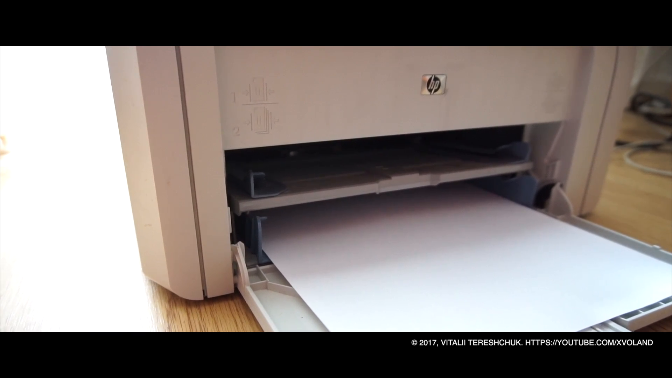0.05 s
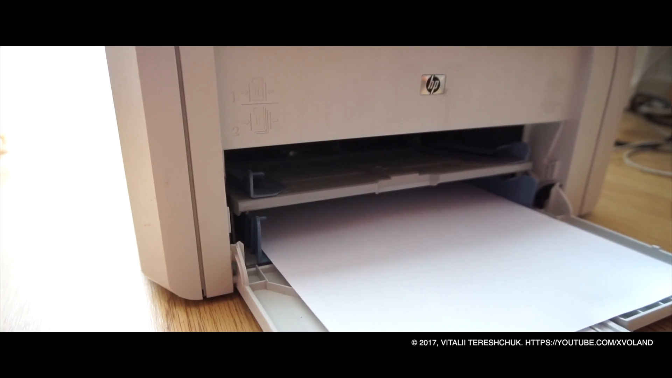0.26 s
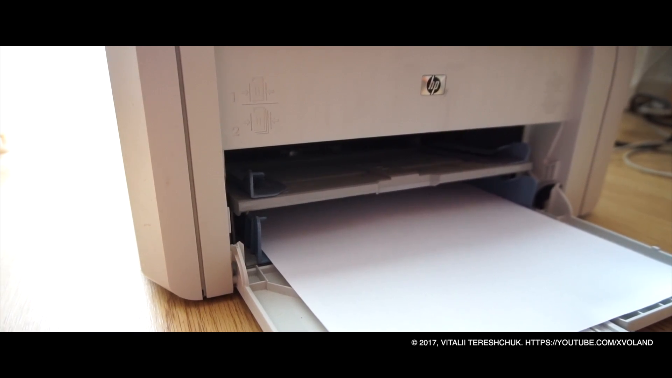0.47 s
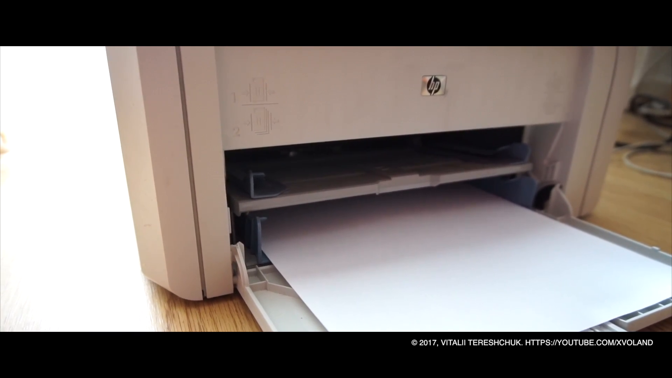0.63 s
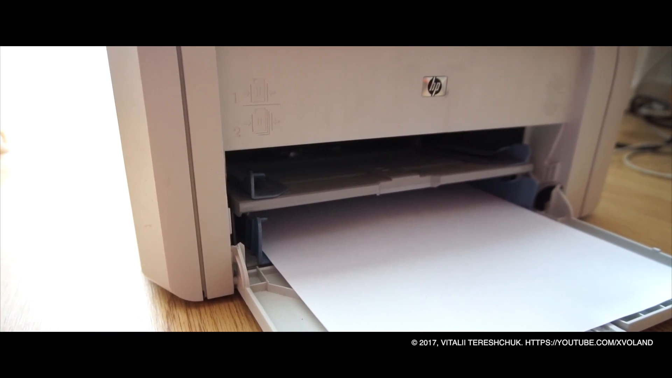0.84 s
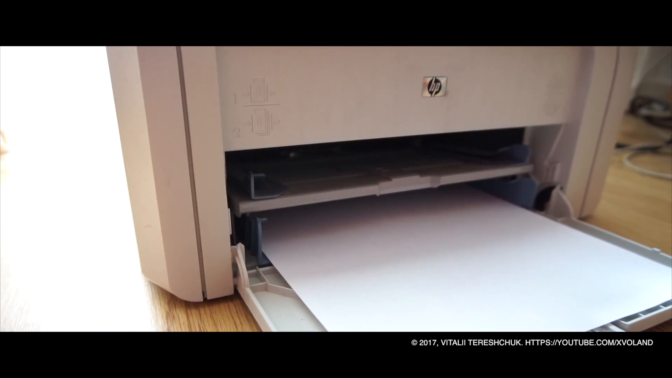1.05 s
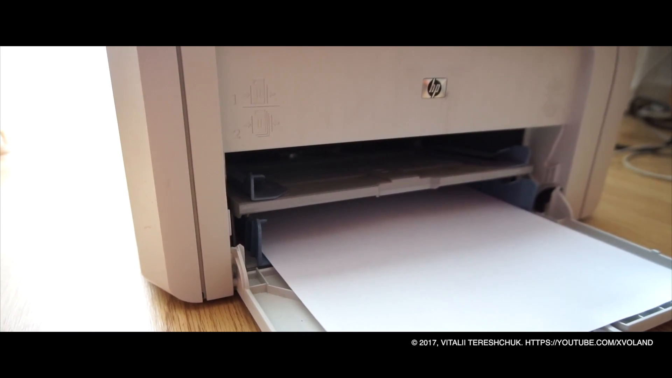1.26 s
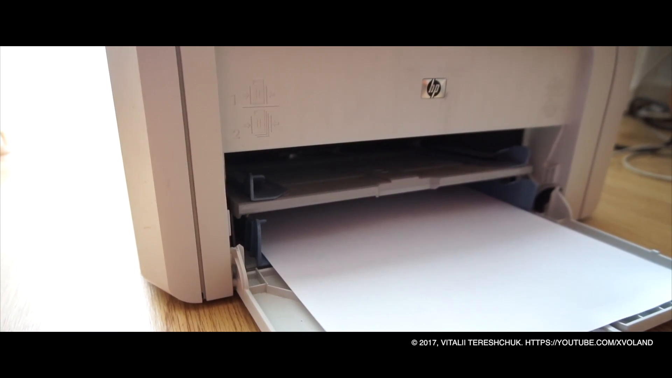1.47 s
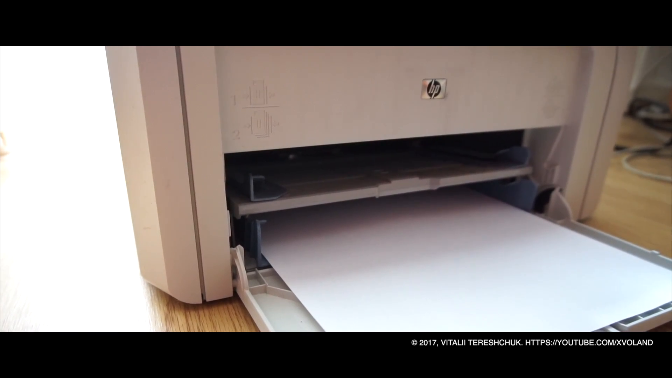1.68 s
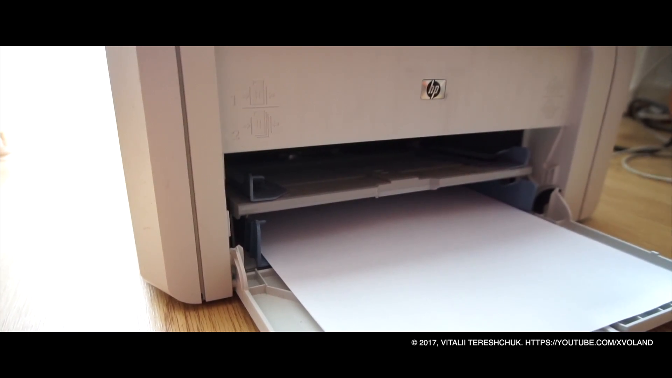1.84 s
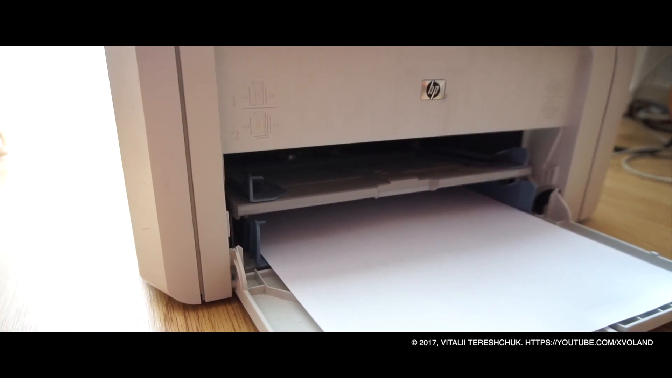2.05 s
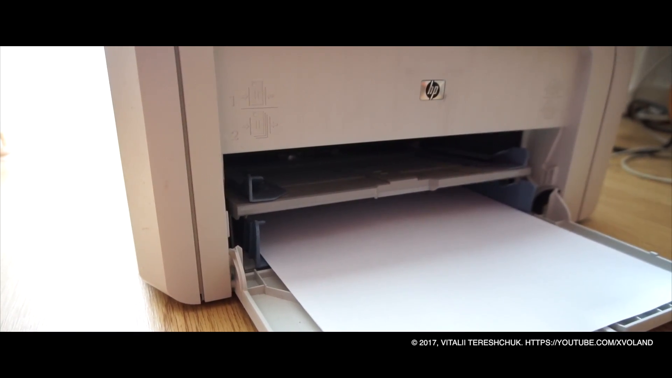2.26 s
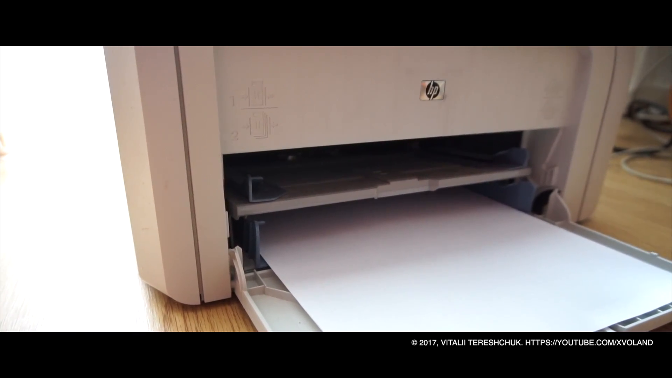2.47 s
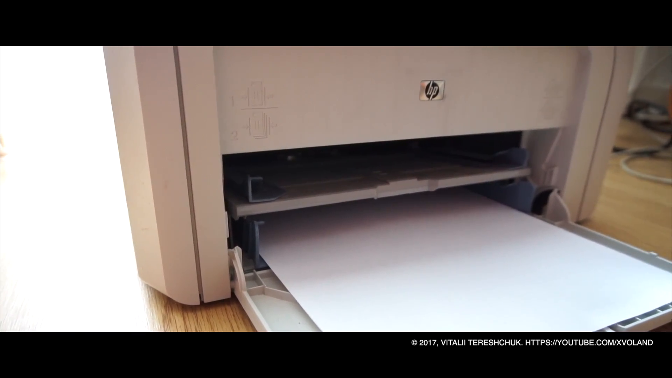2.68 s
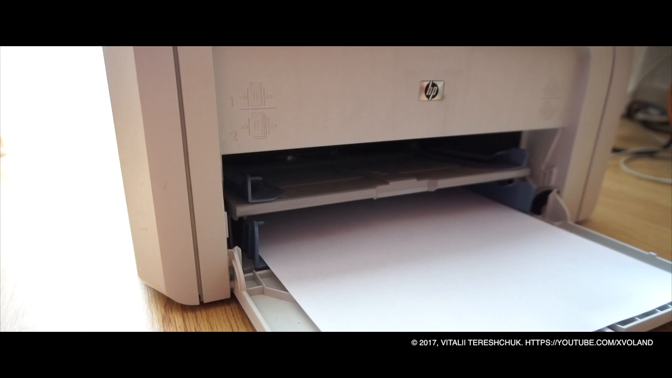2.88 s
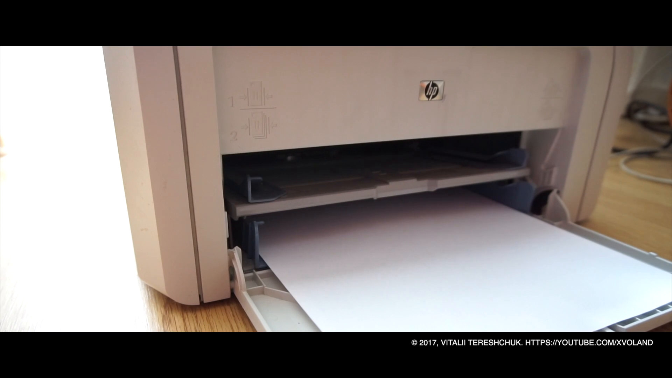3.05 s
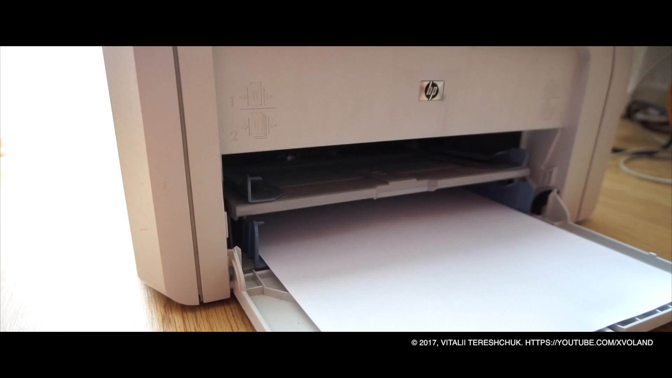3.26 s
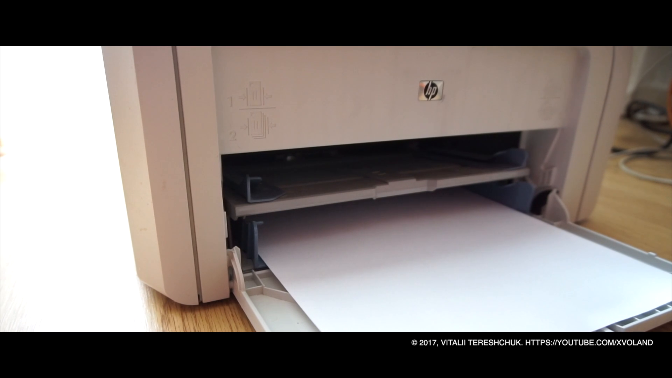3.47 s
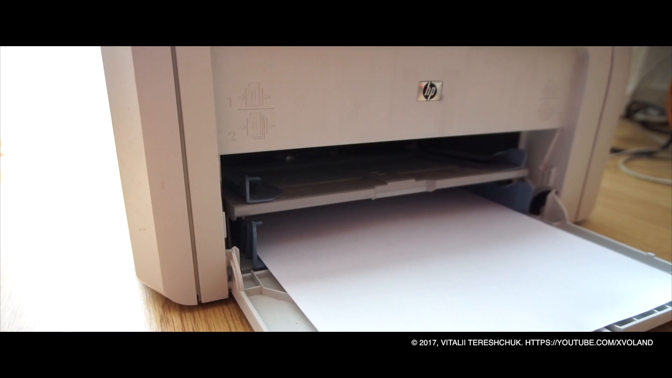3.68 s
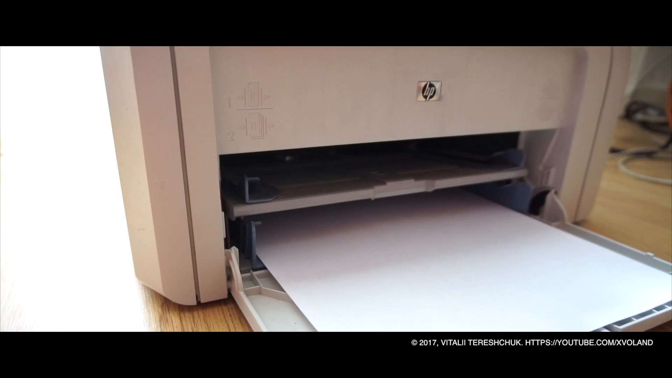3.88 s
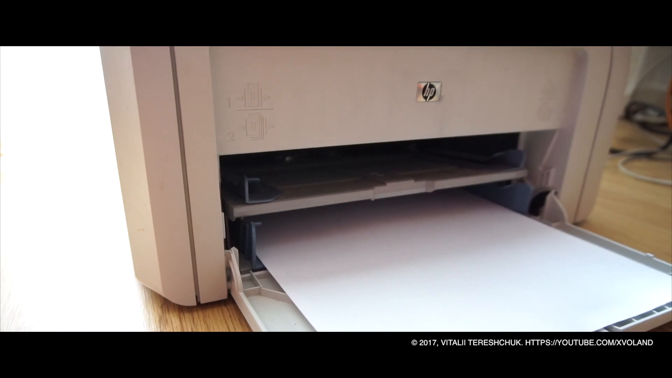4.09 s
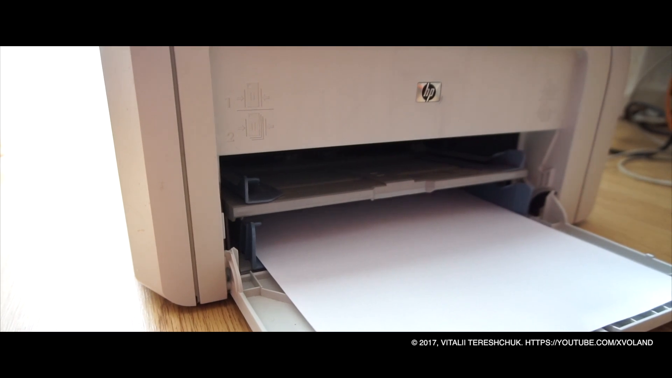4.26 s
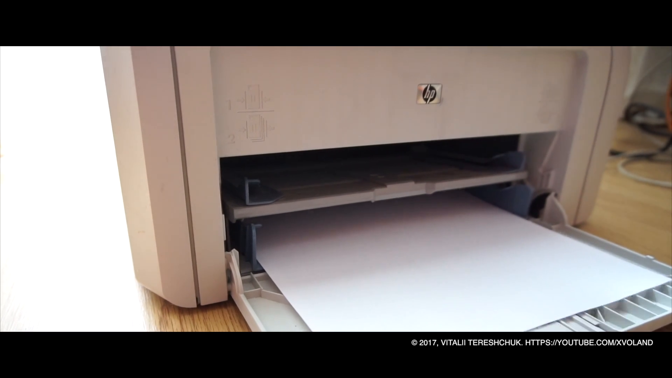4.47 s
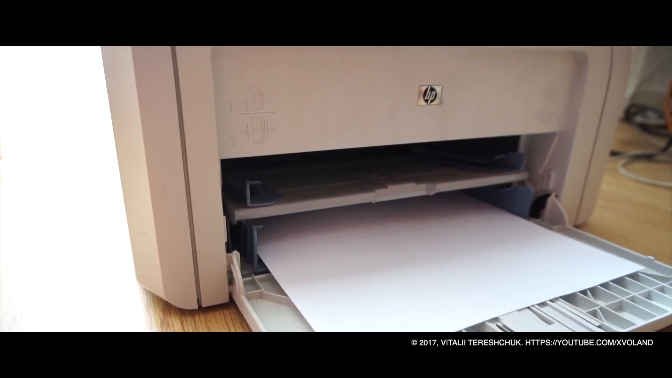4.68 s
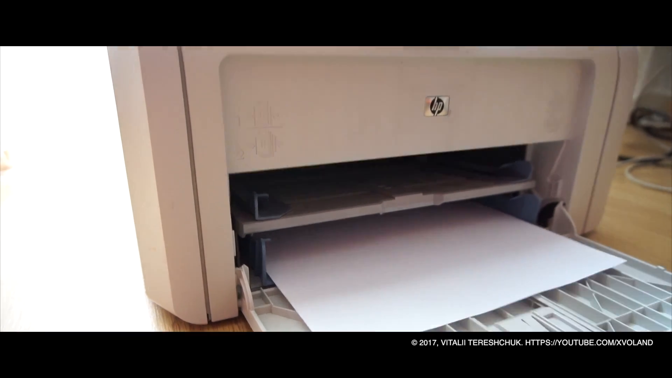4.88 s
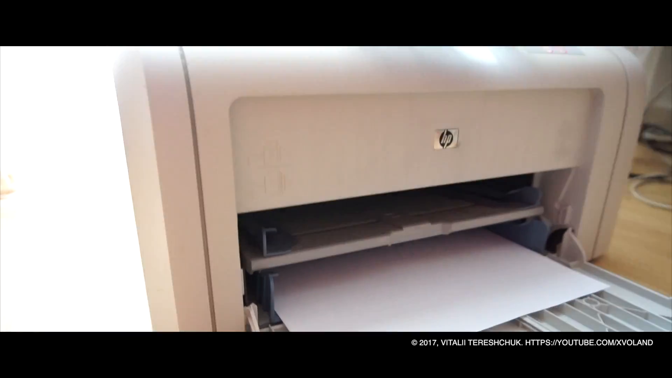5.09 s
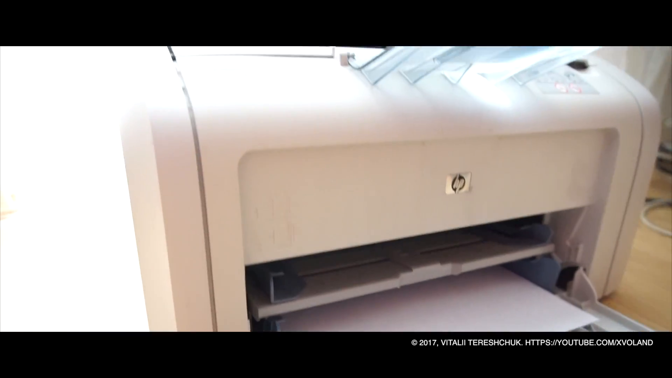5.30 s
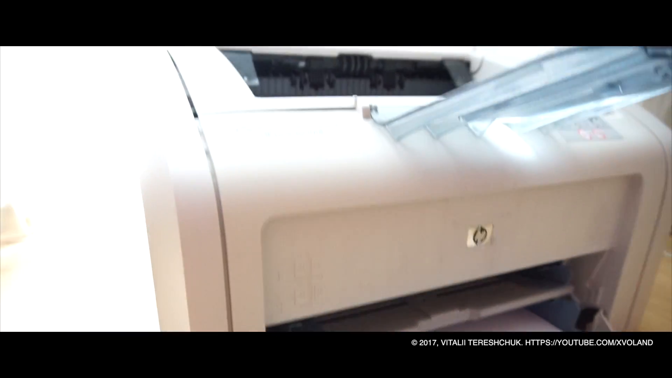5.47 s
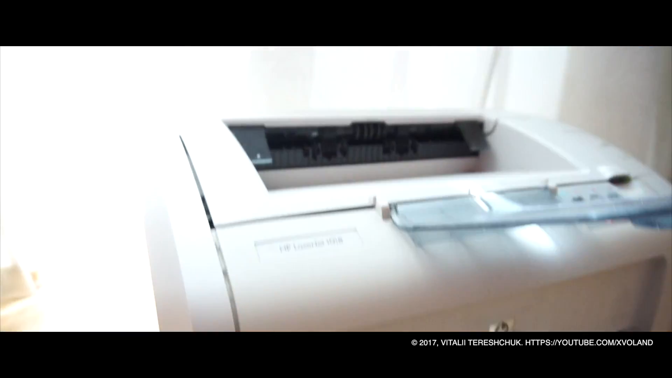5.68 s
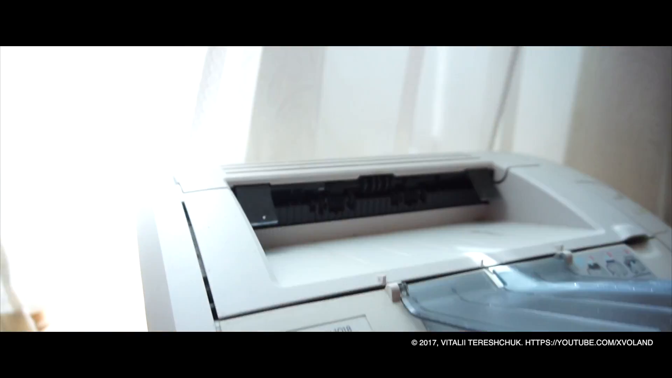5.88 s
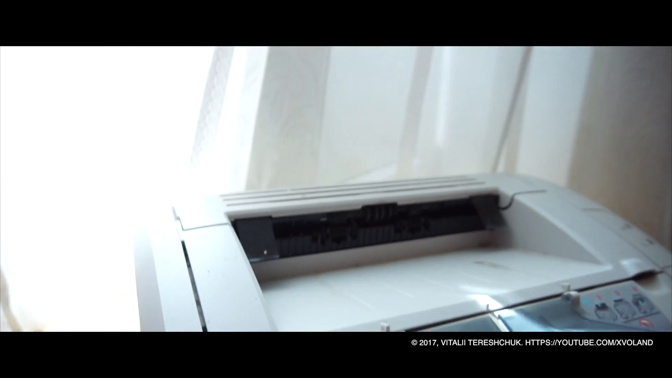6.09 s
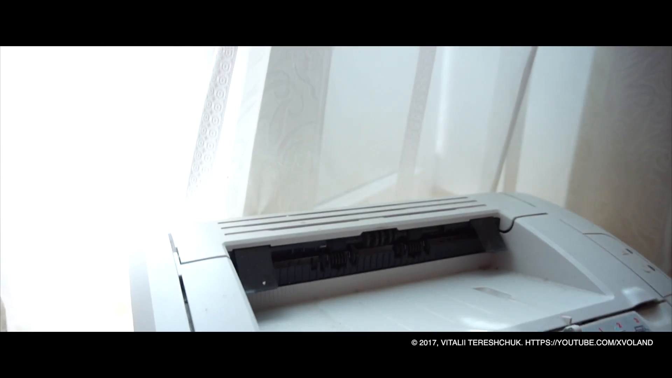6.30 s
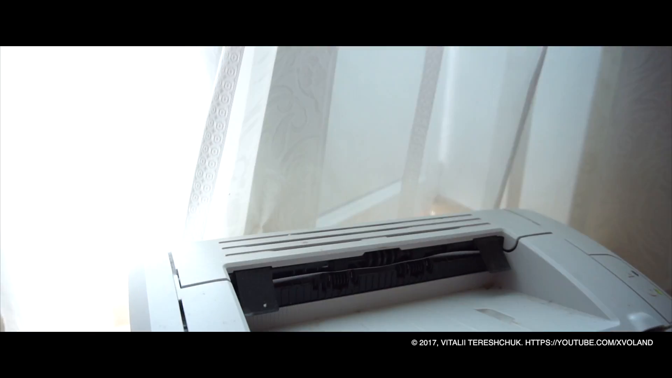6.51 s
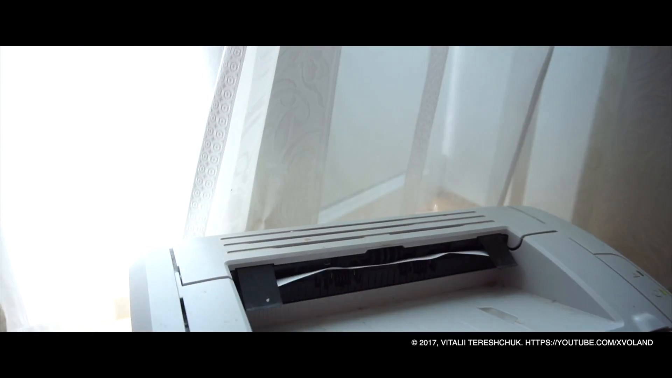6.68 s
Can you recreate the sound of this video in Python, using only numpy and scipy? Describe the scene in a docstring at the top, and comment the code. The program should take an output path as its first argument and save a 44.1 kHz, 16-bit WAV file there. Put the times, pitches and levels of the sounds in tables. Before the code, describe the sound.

A desktop printer is heard very close in a small, fairly dry room. A steady mid-low motor hum with gear rumble and soft hiss runs until about 0.9 s, when it brakes abruptly into a short, fluttering buzz with a dying rattle. Around 1.05 s it kicks and lurches, groaning upward to speed by 1.3 s, while a thin whistle climbs until about 2 s. The hum, briefly stronger, settles into a steady run with tiny dry chirps. At 4.05-4.25 s plastic parts clack in a rapid cluster; the motor grows louder under load. From 4.3 to 5.1 s a sheet jerks, rubs and hisses, strongest near 4.8 s, with clacks at 4.8 and 4.86. More hard clacks cluster at 5.1-5.3 s. The microphone rises, the hum wavers and weakens, high tones emerge, dull paper rubbing continues, and a scrape swells into crackle at 6.7 s.

```python
"""A desktop laser printer, heard close by in a small room: its drive hums from motor steps and gear teeth,
halts with a buzz, and groans back to speed while the mirror motor whistles up.
A solenoid trips the pick-up roller, a sheet rubs and hisses off the stack, and the lift plate clacks back.
The microphone then rises over the lid, where the sheet scrapes and crackles into the exit rollers.
Hums are sums of sines; rubbing and paper are shaped noise; clacks are short bursts that ring the plastic."""
import sys
import numpy as np
from scipy import signal
from scipy.fft import rfft, irfft, next_fast_len
from scipy.io import wavfile
from scipy.ndimage import uniform_filter1d, map_coordinates

SR = 44100
rng = np.random.default_rng(int(sys.argv[2]) if len(sys.argv) > 2 else 0)


def dump_mix(stems):
    """Bounce the given channels to the path in sys.argv[1] as a 16-bit WAV at rate SR."""
    frames = np.atleast_2d(stems).T  # one column per channel
    limited = np.clip(frames, -1, 1)  # hard clip at full scale
    pcm = np.round(limited * 32767).astype(np.int16)
    wavfile.write(sys.argv[1], SR, pcm)


N = 297234
TIME = np.arange(N) / SR
TOP_HZ = 15800  # nothing sounds above this
SHAFT_HZ = 20.083  # locked speed of the drive shaft, turns a second
# the drive begins to stop, is held still, pulls away, and locks to speed again (s)
STOP_S, HOLD_S, START_S, LOCK_S = 0.86, 0.886, 1.04, 1.27
# the microphone rises from the tray to above the lid: start, duration (s)
RISE_S, RISE_TAKES_S = 5.216, 0.88

# how well the frame radiates: (frequency [Hz], gain [dB])
FRAME_RADIATION = [(40, -42), (130, -19), (200, -6), (270, -2), (400, 14), (520, 14), (720, -5),
                   (1200, -13.5), (4000, -27)]
# colour of the gears' rumble: (frequency [Hz], relative level [dB])
RUMBLE_COLOUR = [(25, -46), (105, -54), (150, -12), (205, -4), (250, -7), (330, -0.5), (520, 3.5),
                 (700, -5), (920, 1.5), (1070, -7), (1150, 0.5), (1225, 6), (1340, -9), (2500, -40)]
# colour of the paper's hiss: (frequency [Hz], relative level [dB])
PAPER_COLOUR = [(1760, -46), (2600, -13), (3620, -15), (3960, -5), (4310, -1.5), (4910, -2.5), (5900, 2.5),
                (6910, -3.5), (8400, 0.5), (9650, -3), (12100, -0.5), (14000, -6.5), (15800, -10.5)]
# the hums fade and swell as the microphone moves, and the motor step dips as the load jolts: (time [s], motor
# step change [dB], mirror motor change [dB])
HUM_FADING = [(5.2, 0.5, 0), (5.26, -5.5, -1), (5.42, 1, -0.5), (5.85, 0, 1), (5.97, -1, -1),
              (6.14, 3, -2), (6.26, -8, 1), (6.39, 1.5, 0.5), (6.51, -11, -1.5), (6.7, 1.5, -0.5)]


def amp(db):
    """Turn decibels into a gain."""
    return 10 ** (np.asarray(db) / 20)


def unit(x):
    """Scale to an rms of 1."""
    return x / np.sqrt(np.mean(x ** 2) + 1e-20)


def along(points, hz):
    """Read a curve of (Hz, value) points on a logarithmic frequency axis."""
    point_hz, values = np.transpose(points)
    return np.interp(np.log(hz + 1), np.log(point_hz + 1), values)


def curves(rows):
    """Draw one value per sample for each column after the time."""
    times, *columns = np.transpose(rows)
    return [np.interp(TIME, times, column) for column in columns]


def between(start, end, fade):
    """Open a gate with soft edges."""
    return np.clip((TIME - start) / fade, 0, 1) * np.clip((end - TIME) / fade, 0, 1)


def ramp(start, length):
    """Rise from 0 to 1 and stay there."""
    return np.clip((TIME - start) / length, 0, 1)


def bump(s, width):
    """Make a smooth swell of height 1 around time s."""
    return np.exp(-((TIME - s) / width) ** 2)


def wobble(rate):
    """Make a smooth random curve with this many random points a second."""
    return map_coordinates(rng.standard_normal(int(N * rate / SR) + 4), [TIME * rate])


def phase(hz):
    """Add up a moving frequency into a running angle."""
    return 2 * np.pi * np.cumsum(hz) / SR


def filtered(x, response):
    """Multiply the spectrum of x by a response that depends on frequency."""
    size = x.shape[-1]
    padded = next_fast_len(size + SR // 8)
    spectrum = rfft(x, padded) * response(np.fft.rfftfreq(padded, 1 / SR))
    return irfft(spectrum, padded)[..., :size]


def resonance(f, centre, width):
    """Respond like one ringing part: strongest at its centre, narrower if it rings longer."""
    return 1j * f * width / (centre * centre - f * f + 1j * f * width)


def resonate(x, modes):
    """Ring x through (Hz, width Hz, dB) resonances of alternating sign; rms 1."""
    def response(f):
        return sum((-1) ** k * amp(db) * resonance(f, centre, width)
                   for k, (centre, width, db) in enumerate(modes))
    return unit(filtered(x, response))


def noise(spectrum, size=N):
    """Make coloured stereo noise of rms 1, alike left and right in the bass and unrelated in the treble."""
    # (frequency [Hz], left-right likeness [0 to 1])
    likeness = [(100, 1), (400, 0.93), (1300, 0.65), (2000, 0.6), (4000, 0.35), (8000, 0.29),
                (13000, 0.022)]

    def response(hz):
        turn = np.arccos(np.clip(along(likeness, hz), -1, 1)) / 2
        return amp(along(spectrum, hz)) * [np.cos(turn), np.sin(turn)]
    mid, side = filtered(rng.standard_normal((2, size)), response)
    return unit(np.array([mid + side, mid - side]))


def patchy(x, patchy_db):
    """Give noise random swells, a few hundred Hz wide and some tens of ms long; rms 1."""
    z = signal.stft(x, nperseg=256)[2]
    field = uniform_filter1d(rng.standard_normal(z.shape[1:]), size=3, axis=0)
    field = uniform_filter1d(field, size=9, axis=1)
    return unit(signal.istft(z * amp(patchy_db * unit(field)), nperseg=256)[1][:, :N])


def add(track, s, sound):
    """Mix a sound in at time s."""
    part = track[:, round(s * SR):][:, :sound.shape[-1]]
    part += sound[..., :part.shape[-1]]


def shaft_speed(early_hz=20.18, pull_hz=3.6):
    """Turns a second: steady, braked to rest, then gathering speed by a constant ratio until it locks."""
    braking = early_hz * (1 - ramp(STOP_S, HOLD_S - STOP_S))
    run_up = pull_hz * (SHAFT_HZ / pull_hz) ** ramp(START_S, LOCK_S - START_S)
    return np.where(TIME < START_S, braking, run_up)


def drive_level(free_db, surge_db, feed_db, lid_db):
    """A layer's level in dB follows the strain of the restart, the load of the sheet and the microphone."""
    # the strain builds up in 0.078 s and settles over 0.53 s
    surge = ramp(LOCK_S, 0.078) * np.exp(-np.maximum(TIME - LOCK_S, 0) / 0.53)
    # the sheet loads the drive from 4.1 s and lets go from 5.27 s
    feed = ramp(4.1, 0.45) - ramp(5.27, 0.78)
    return free_db + surge_db * surge + feed_db * feed + lid_db * ramp(RISE_S, RISE_TAKES_S)


def drive(step_order=24, step_run_up_db=-11, mesh_run_up_db=-23, lock_fade=0.016):
    """Motor steps and gear teeth hum at multiples of one shaft's speed, and sweep, weaker, as it speeds up."""
    # multiples of the shaft speed at which the gears sound, and their relative levels [dB]
    gear_orders = [10, 20, 22, 23, 25, 27, 30, 40, 45, 47, 48, 50, 60, 72, 79, 80, 95, 96, 97, 120, 144,
                   145, 191, 192]
    gear_db = [-69, -67.5, -76.5, -72.5, -75.5, -71.5, -76, -69.5, -74.5, -72.5, -67, -75.5, -62.8, -77,
               -80, -76, -73, -75, -80, -96, -77, -82, -81.5, -84]
    # layer levels: running free [dB], then extra after the restart, while feeding, above the lid [dB]
    step_levels = (-48, 11.5, 8, -11.5)
    mesh_levels = (0.6, 0.5, 9, -4)
    speed = shaft_speed()
    turning = 1 - between(STOP_S, START_S + 0.01, 0.015)
    slipping = between(START_S - 0.01, LOCK_S + 0.002, lock_fade)
    step_db = drive_level(*step_levels) + step_run_up_db * slipping + curves(HUM_FADING)[0]
    mesh_db = drive_level(*mesh_levels) + mesh_run_up_db * slipping
    shaft = phase(speed * (1 + 0.00089 * wobble(45)))

    def radiated(order):
        # the frame's gain now, relative to its gain at locked speed
        return along(FRAME_RADIATION, order * speed) - along(FRAME_RADIATION, order * SHAFT_HZ)
    step_gain = amp(step_db + radiated(step_order) + 0.95 * wobble(20))
    out = step_gain * np.sin(step_order * shaft) * amp([[-0.6], [0.6]])
    for order, db in zip(gear_orders, gear_db):
        offset = rng.uniform(0, 2 * np.pi) + rng.normal(0, 0.1, (2, 1))
        gain = amp(db + mesh_db + radiated(order) + 1.8 * wobble(12))
        out += gain * np.sin(order * shaft + offset + 0.18 * wobble(20))
    return np.sqrt(2) * turning * out


def gear_noise(coast_t60=0.32, rest_db=-19, hiss_growth=0.52, swell_width=0.069, run_up_db=-2):
    """Teeth and bearings rub, swelling a little at the shaft's pace; the rumble dies away in the halt."""
    # colours of the hiss and of the frame's drone: (frequency [Hz], relative level [dB])
    hiss_colour = [(820, -49), (1400, -3.5), (1710, -3.5), (1820, -4.5), (1980, -1.5), (2080, -7.5),
                   (2400, -4), (2760, -10.5), (3000, -8.5), (3180, -10), (4020, -8.5), (4310, -9.5),
                   (9610, -14), (10900, -12.5), (15800, -25.5)]
    drone_colour = [(25, -45), (75, -25.5), (105, -25), (160, -23), (207, 10.5), (240, -39), (400, -42)]
    # layer levels: running free [dB], then extra after the restart, while feeding, above the lid [dB]
    rumble_levels = (-58.5, 6, 9, -1.5)
    hiss_levels = (-59.5, -.5, 13, -2)
    drone_levels = (-70.5, -4, 10.5, 0.5)
    # the drone swells now and then: (time [s], level [dB])
    drone_swells = [(.28, -60), (.83, -66), (1.41, -55.5), (1.54, -65), (1.88, -68), (2.13, -55.5),
                    (2.92, -61)]
    turning = np.sin(2 * np.pi * SHAFT_HZ * TIME)
    coasting = amp(-60 * np.maximum(TIME - 0.965, 0) / coast_t60)
    starting = ramp(START_S, 0.01) * amp(run_up_db * (TIME < LOCK_S))
    shaking = np.where(TIME < START_S, coasting, starting)
    rubbing = np.maximum((shaft_speed() / SHAFT_HZ) ** hiss_growth, amp(rest_db) * (1 + shaking))
    rumble_gain = shaking * amp(drive_level(*rumble_levels) + 0.57 * wobble(16) + 1.0 * turning)
    hiss_gain = rubbing * amp(drive_level(*hiss_levels) + 0.4 * wobble(24.87) + 0.3 * turning)
    swelling = sum(amp(db) * bump(s, swell_width) for s, db in drone_swells)
    drone_gain = rubbing * amp(drive_level(*drone_levels)) + shaking * swelling
    return rumble_gain * noise(RUMBLE_COLOUR) + hiss_gain * noise(hiss_colour) + drone_gain * noise(drone_colour)


def chirps(pitch_hz=11100, length=0.0075, level_db=-52, waver=0.0263, slip_s=1.081, slip_db=-1):
    """A dry roller bearing squeaks at the same place in each turn, and once as it breaks free after the halt."""
    chirp_s, roller_turns = 1.815, 13.56  # time of one chirp (s), shaft turns per roller turn
    out = np.zeros((2, N))
    t = np.arange(-SR // 25, SR // 25) / SR
    turns = np.cumsum(shaft_speed()) / SR / roller_turns
    since_chirp = turns - np.interp(chirp_s, TIME, turns)
    times = TIME[1:][np.diff(np.floor(since_chirp)) > 0]
    for s, db in [(s, 0) for s in times] + [(slip_s, slip_db)]:
        slip = waver * unit(uniform_filter1d(rng.standard_normal((2, len(t))), size=70))
        tone = np.sin(2 * np.pi * np.cumsum(pitch_hz * (1 + slip), axis=1) / SR)
        add(out, s + t[0], amp(level_db + db) * np.exp(-(t / length) ** 2) * tone)
    return out


def halt(hold_hz=471, rock_t60=0.35, flutter_db=5, rattle_db=-66):
    """The halted rotor rocks in its magnetic detent, splitting the holding current's buzz and rattling the gears."""
    # buzz of the halted, energised motor: (multiple, level at rest [dB], extra level while rocking [dB])
    hold_tones = [(1, -58.5, -3), (2, -77.5, 10), (3, -75, 10.5), (4, -82, 13), (5, -64, -5), (6, -81, 1),
                  (7, -78, -1), (8, -75, 4), (9, -84, 17), (10, -82, 1), (11, -82, -2)]
    # its rocking mostly quickens, unevenly, as it dies away:
    # (time [s], rocks a second [Hz], tone above the buzz [dB], tone below it [dB])
    rocking = [(.886, 33, -46, -62), (.9, 41, -47, -56), (.925, 40, -49, -45), (.945, 60, -61, -47.5),
               (.97, 68, -50, -63), (1.0, 110, -60, -70), (1.03, 72, -80, -80)]
    # colour of the rattling gears: (frequency [Hz], relative level [dB])
    rattle_colour = [(300, -30), (900, -13), (1400, 1), (2800, -4), (4200, -2), (6000, -21), (12000, -40)]
    rock_hz, upper_db, lower_db = curves(rocking)
    dying = amp(-60 * np.maximum(TIME - 0.95, 0) / rock_t60)
    rock, current = phase(rock_hz), 2 * np.pi * hold_hz * TIME
    bend = dying * (0.08 * np.sin(rock) + 0.1 * wobble(400))

    def flutter():
        swing = flutter_db * np.sin(rock + rng.uniform(0, 2 * np.pi))
        return np.sqrt(dying) * (swing + 2 * wobble(90.4))
    buzz = sum(amp(db + extra_db * dying + flutter()) * np.sin(k * (current + bend))
               for k, db, extra_db in hold_tones)
    split = amp(upper_db) * np.sin(current + rock) + amp(lower_db) * np.sin(current - rock)
    rattle = amp(rattle_db + flutter()) * dying * noise(rattle_colour)
    held = ramp(HOLD_S - 0.003, 0.0039) * (1 - ramp(START_S - 0.003, 0.018))
    return held * (np.sqrt(2) * (buzz + split) + rattle)


def restart(groan_order=60, lurch_width=0.0095, grind_db=-7, pull_db=-66, jitter=0.0353, rough_db=3.5):
    """The motor pulls away in lurches; the main gear mesh groans upward with the shaft, through the casing."""
    # overtones of the groan: (multiple, relative level [dB])
    groan_tones = [(1, -1), (2, -13), (3, -11), (4, -23), (5, -22)]
    # the casing around the main gear: (frequency [Hz], gain [dB])
    casing = [(220, -3), (560, -2), (680, -7), (780, -16), (940, -6), (1060, -8), (1230, 6), (1600, -10),
              (1950, 6), (2600, 2)]
    # the lurches: (time [s], level [dB])
    lurches = [(1.061, -48.5), (1.107, -47.5), (1.128, -54), (1.155, -51), (1.183, -55)]
    hz = groan_order * shaft_speed()
    angle = phase(hz * (1 + jitter * wobble(200)))
    tones = sum(amp(db + along(casing, k * hz) + rough_db * wobble(110)) * np.sin(k * angle)
                for k, db in groan_tones)
    toothed = (1 + np.cos(angle)) * noise(RUMBLE_COLOUR)
    grind = amp(grind_db) * unit(filtered(toothed, lambda f: amp(along(FRAME_RADIATION, f))))
    effort = amp(pull_db) * between(START_S, LOCK_S + 0.022, 0.016)
    effort += sum(amp(db) * bump(s, lurch_width) for s, db in lurches)
    return effort * (np.sqrt(2) * tones + grind)


def rebounds(count=3):
    """Each blow is followed by quicker contacts, mostly weaker; the soft scrape before the first clack grows."""
    # the motor's kick, solenoid, cam, lift plate and flaps: (time [s], level [dB], main pitch [Hz],
    # thud [dB], crack [dB], loss per rebound, negative if it grows louder [dB],
    # fall an octave from the pitch [dB], left minus right [dB])
    blows = [(1.045, -51.5, 1240, 4, -26, 5, 8, 0), (4.044, -35, 2620, -33, -4.5, -4, -2, 7),
             (4.058, -17, 1620, -33, -6, 20, -2, 2.5), (4.0672, -17, 1690, -32, -23, 25, 11, 2.5),
             (4.077, -22.5, 1800, -22, -24, 12, 9, 2.5), (4.094, -31, 1775, -31, -30, 1, 30, 0),
             (4.117, -28.5, 1460, -31, -16, 7.5, 17, 2), (4.192, -17.5, 2200, -17, -34, 26, 65, 3.5),
             (4.199, -17, 1950, -38, -27, 19, 55, 0), (4.215, -23.5, 1480, -40, -12, 22, -3, 8.5),
             (4.22, -27, 2700, -35, -6, 24, 6, 8), (4.2239, -15, 1280, -31, -18, 24, 24, -2),
             (4.2355, -21.5, 1720, -20, -14.5, 6, -1, 2), (4.797, -20.5, 1620, -17, -5, 19, 17, 0),
             (4.864, -16.5, 1780, -27, -23, 7, 16, -1), (5.08, -18, 1810, -19, 0.5, 20, 26, 0.5),
             (5.091, -20.5, 1740, -20, -5, 8, 14, -2), (5.107, -22.5, 2780, -30, -1, 8, 11, 1),
             (5.111, -20.5, 1940, -26, -3, 17, 13, 1), (5.1652, -20, 1560, -32, -14.5, 21, 14, -1),
             (5.2053, -16.5, 1340, -10.5, -15, 8, 5, 0), (5.22, -24.5, 2520, -16, -18, 12, 13, -1),
             (5.231, -10.5, 1404, -26, -8, 18, 5, 1), (5.2362, -17, 1390, -14, -15, 8, 5, 2),
             (5.247, -24.5, 2250, -8, -22, 11, 15, -.5), (5.265, -28.5, 1360, -18, -27, 9, 13, -4),
             (5.316, -33, 795, -5.5, -16, 12, 12, -1), (6.69, -29, 2840, -45, -29, 2, 37, -8)]
    flight_s, shrink = 0.0085, 0.9  # first flight (s), each flight over the one before
    for s, db, hz, thud, crack, loss_db, focus_db, pan_db in blows:
        for k in range(count):
            flights = sum(shrink ** j for j in range(k))
            level = db - loss_db * k ** 1.04
            softer_crack = crack - 7 * k
            yield s + flight_s * flights, level, hz, thud, softer_crack, focus_db, pan_db


def clacks(contact_t60=0.019, crack_t60=0.04, thud_t60=0.19, note_t60=0.032, knock_db=-25, ring_db=-23.0,
           note_db=-7, crack_db=-21, thud_db=-22, dull_db=6, detune=0.014, low_cut_hz=110):
    """Plastic parts strike and chatter: each sounds a note, levers crack, the housing rings, the frame thuds."""
    # resonances of the plastic housing: (frequency [Hz], width [Hz], relative level [dB])
    housing = [(657, 100, -4), (883, 73, 1.5), (1202, 85, 0), (1370, 73, 2), (1493, 52, -1.5),
               (1614, 47, 4), (1770, 68, 2.5), (1915, 72, 2), (2085, 68, -2.5), (2250, 50, 4),
               (2546, 80, -1), (2720, 80, 5), (3030, 140, 0.5), (3650, 70, 1.5), (4050, 130, 1)]
    # small, stiff parts of the feed: (frequency [Hz], width [Hz], relative level [dB])
    levers = [(3040, 320, 2), (3705, 82, -2.5), (3900, 280, -12), (4400, 170, 0.5), (5120, 190, 0.5),
              (5470, 44, 0.5), (6140, 270, -0.5), (7230, 250, -5), (7850, 410, -1.5), (9870, 770, -4.5),
              (12200, 1100, -10.5)]
    # the bare contact before the housing rings, and the thud: (frequency [Hz], level [dB])
    knock_colour = [(400, -30), (900, -5.5), (1300, 1.5), (2200, 0.5), (3300, -4), (6000, -27)]
    thud_colour = [(40, -50), (95, -40), (140, -7), (180, 2), (300, 4), (450, -1), (800, -1), (2000, -36)]
    crack_colour = [(1500, -10), (4000, 2.0), (15000, -4.0)]  # (Hz, dB)
    out, size = np.zeros((2, N)), SR // 5
    t = np.arange(size) / SR

    def decay(t60):
        return amp(-60 * t / t60) * (1 - np.exp(-t / 0.00039))

    def burst(spectrum, t60):
        return noise(spectrum, size=size) * decay(t60)
    for s, db, hz, thud, crack, focus_db, pan_db in rebounds():
        # the blow's colour is set around the part's pitch
        contact = [(hz / 2, -focus_db), (hz, 0), (hz * 2, -focus_db - dull_db),
                   (hz * 4, -focus_db - 2 * dull_db)]
        pitch = hz * (1 + rng.normal(0, detune))
        drift = 0.0071 * np.cumsum(rng.standard_normal(size))
        note = amp(note_db) * decay(note_t60) * np.sin(2 * np.pi * pitch * t + drift)
        blow = burst(contact, contact_t60)
        knock = amp(knock_db) * unit(filtered(blow, lambda f: amp(along(knock_colour, f))))
        ring = knock + amp(ring_db) * resonate(blow, housing)
        snap = amp(crack + crack_db) * resonate(burst(crack_colour, crack_t60), levers)
        boom = amp(thud + thud_db) * unit(burst(thud_colour, thud_t60))
        sides = np.array([[pan_db], [-pan_db]]) / 2
        add(out, s, amp(db + sides) * (note + ring + snap + boom))
    return filtered(out, lambda f: f ** 2 / np.hypot(f ** 2, low_cut_hz ** 2))


def mirror(mirror_hz=294.15, beam_s=5.32, beam_width=0.26, beam_db=27, lid_db=15, rasp_db=-21,
           jitter=0.0066, flare_width=0.018):
    """The laser's mirror motor whistles up through resonances, then sings; high tones beam out of the top."""
    # the run-up: (time [s], pitch [Hz])
    run_up = [(1.172, 0), (1.46, 1440), (1.6, 2120), (1.69, 2530), (1.83, 3120), (1.97, 3640), (2.05, 3850)]
    # tones of the whistle: (multiple, relative level [dB])
    whistle_tones = [(3, 0.5), (4, -35), (5, -29), (6, -13.5), (8, -27), (11, -24)]
    # resonances of the scanner: (frequency [Hz], width of one stage [Hz], level [dB])
    scanner = [(2150, 600, -66), (3200, 900, -62), (4270, 450, -57), (6380, 190, -31)]
    # overtones that flare up briefly near full speed: (time [s], multiple, level [dB])
    flares = [(1.69, 3, -72), (1.74, 3, -69), (1.83, 4, -62), (1.98, 1, -64.5), (2.01, 2, -69)]
    # steady tones: (multiple, level [dB], share of the beaming gain [0 to 1])
    steady_tones = [(2, -75, 0), (4, -56.7, .09), (6, -78, .7), (12, -83.5, 1)]
    spin, = curves(run_up)
    angle = phase(spin * (1 + jitter * wobble(700)))
    whistle = sum(amp(db) * (k * spin < TOP_HZ) * np.sin(k * angle) for k, db in whistle_tones)
    rasp = amp(rasp_db + 4 * wobble(45.1)) * rng.standard_normal(N)
    whistle = between(LOCK_S - 0.04, 1.95, 0.048) * amp(3.3 * wobble(60.0)) * (whistle + rasp)
    # each resonance acts three times in a row
    out = filtered(whistle, lambda f: sum(amp(db) * resonance(f, centre, width) ** 3
                                          for centre, width, db in scanner))
    out += sum(amp(db) * bump(s, flare_width) * np.sin(k * phase(spin)) for s, k, db in flares)
    beaming_db = beam_db * bump(beam_s, beam_width) + lid_db * ramp(RISE_S, RISE_TAKES_S / 2)
    fading_db = curves(HUM_FADING)[1]
    singing = between(1.39, 8, 0.053)  # fades in and lasts to the end
    for k, db, share in steady_tones:
        tone = np.sin(k * mirror_hz * 2 * np.pi * TIME + 0.14 * wobble(24))
        out += singing * amp(db + share * beaming_db + fading_db + 0.7 * wobble(15)) * tone
    return np.sqrt(2) * out


def fibres(per_s=2400, spread_db=3, clump_db=3.5):
    """Tiny snaps of paper fibres come in clumps; rms 1."""
    chance = amp(clump_db * wobble(70)) * per_s / SR
    snaps = (rng.random(N) < chance) * rng.standard_normal(N)
    snaps = snaps * amp(spread_db * rng.standard_normal((2, N)))
    return unit(filtered(snaps, lambda hz: amp(along(PAPER_COLOUR, hz))))


def paper(grain_db=-0.7, rub_gain_db=0, hiss_gain_db=0.5, inside_db=-47, inside_lid_db=-9, roller_db=-55):
    """The roller brushes the stack, then fibres catch and slip; inside the machine the sheet sounds duller."""
    # the sheet sliding off the stack: (time [s], rub [dB], hiss before its gain [dB])
    slide = [(4.33, -55, -50.5), (4.402, -49, -44), (4.42, -45, -39.5), (4.44, -47, -37.5),
             (4.496, -39.5, -37), (4.56, -44.5, -41), (4.66, -44, -36.5), (4.725, -37.5, -31),
             (4.792, -29.5, -30.5), (4.845, -34.5, -36), (4.868, -32, -30.5), (4.908, -43.5, -39),
             (4.97, -49, -47.5), (5.06, -46.5, -47.5)]
    # colours of the rub and of the sheet inside: (frequency [Hz], relative level [dB])
    rub_colour = [(200, -90), (450, -37.5), (700, -38), (950, -3), (1100, -10), (1250, -5), (1450, 0),
                  (1750, 7.5), (2080, 2.5), (2600, -7), (3500, -4.5), (4300, -9), (5500, -44), (9000, -90)]
    inside_colour = [(740, -34), (1250, -4), (1380, -7), (1720, 1.5), (2080, -3), (2360, 0.5), (3350, -3.5),
                     (3650, -8), (3770, -0.5), (5130, -8.5), (11900, -13.5), (14100, -14), (15800, -51)]
    rub_db, hiss_db = curves(slide)
    grains = unit(amp(grain_db * wobble(900) + 1.6 * wobble(60)))
    rub = amp(rub_db + rub_gain_db) * patchy(noise(rub_colour), patchy_db=4.0)
    friction = patchy(noise(PAPER_COLOUR) + 1.2 * fibres(), patchy_db=3.6)
    hiss = amp(hiss_db + hiss_gain_db) * friction * amp([[0.6], [-0.6]])
    roller = amp(roller_db) * between(4.24, 4.36, 0.058) * noise(PAPER_COLOUR)
    inside_gain = amp(inside_db + inside_lid_db * ramp(RISE_S, RISE_TAKES_S) + 0.8 * wobble(21))
    inside = inside_gain * patchy(noise(inside_colour), patchy_db=3.0)
    sliding = between(4.327, 5.12, 0.0055) * grains * (rub + hiss)
    return roller + sliding + between(5.06, 8, 0.09) * inside


def jerks():
    """The sheet breaks free from the stack in small jerks, each a brief, bright burst of noise."""
    # (time [s], level [dB], time to fall by 60 dB [s])
    jerk_list = [(4.333, -38, .2), (4.381, -31, 0.049), (4.407, -39.5, 0.076), (4.413, -32, 0.073),
                 (4.496, -31, 0.093), (4.518, -35, 0.064), (4.616, -35, 0.13), (4.714, -28.5, 0.082),
                 (4.782, -28, .07)]
    out = np.zeros((2, N))
    t = np.arange(SR // 5) / SR
    for s, db, t60 in jerk_list:
        add(out, s, amp(db - 60 * t / t60) * noise(PAPER_COLOUR, size=len(t)))
    return out


def trailing_edge(level_db=-49, width_hz=450):
    """As the last of the sheet slides in, a band of its hiss glides down."""
    # (time [s], centre [Hz])
    glide = [(4.87, 10500), (4.93, 9500), (5.0, 8300), (5.03, 6300), (5.08, 5960)]
    hz, = curves(glide)
    band = unit(filtered(rng.standard_normal((2, N)), lambda f: np.exp(-(f / width_hz) ** 2)))
    gain = amp(level_db + 3.1 * wobble(50)) * between(glide[0][0], glide[-1][0], 0.022)
    # multiplying by a sine moves the low band of noise up to the gliding pitch
    return np.sqrt(2) * gain * band * np.sin(phase(hz))


def sheet_exit(exit_s=6.691, grain_db=3, approach_db=-46, approach_db_per_s=110, scrape_db=-40.0,
               crackle_db=-37):
    """The leading edge scrapes ever louder along the guide, then crackles between the exit rollers."""
    # colours of the scrape and the crackle: (frequency [Hz], relative level [dB])
    scrape_colour = [(300, -89), (1000, -12), (1600, -17.5), (2200, -0.5), (3250, -8), (3700, -25),
                     (4700, -13), (6000, -35), (9000, -73)]
    crackle_colour = [(800, -90), (3000, -27), (6400, -15), (7200, -1), (8500, 1), (9500, -11), (11300, 4),
                      (13000, 1), (15800, -14)]
    grains = unit(amp(grain_db * wobble(600)))
    approach = amp(approach_db - approach_db_per_s * np.abs(TIME - exit_s))
    scrape = (approach + amp(scrape_db) * ramp(exit_s, 0.002)) * noise(scrape_colour)
    crackle = ramp(exit_s, 0.025) * amp(crackle_db) * noise(crackle_colour)
    return grains * (scrape + crackle)


def room(x):
    """The walls answer with a diffuse tail in which the treble dies first."""
    # (frequency [Hz], time to fall by 60 dB [s])
    tail_t60 = [(200, 0.26), (2000, 0.2), (10000, 0.055)]
    hz, t, z = signal.stft(rng.standard_normal((2, SR // 2)), SR, nperseg=256)
    tail = signal.istft(z * amp(-60 * t / along(tail_t60, hz)[:, None]), SR, nperseg=256)[1]
    delayed = np.pad(x, ((0, 0), (200, 0)))  # in samples
    return signal.fftconvolve(delayed, tail / np.linalg.norm(tail[0]), axes=1)[:, :N]


def scene():
    """The running machine, with the room answering its clacks and chirps."""
    motors = drive() + gear_noise() + halt() + restart() + mirror()
    hits = chirps() + clacks()
    sheet = paper() + jerks() + trailing_edge() + sheet_exit()
    return motors + sheet + hits + amp(-14.0) * room(hits)


def record(dry):
    """Nothing is kept above the band limit."""
    return filtered(dry, lambda hz: hz < TOP_HZ)


dry = scene()
out = record(dry)
dump_mix(out)
```